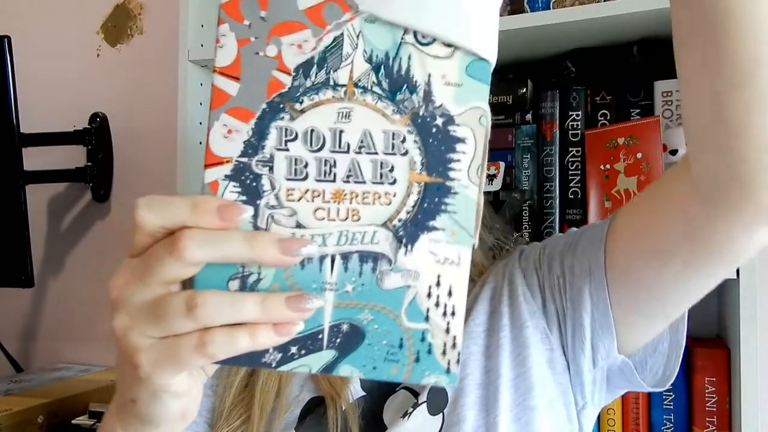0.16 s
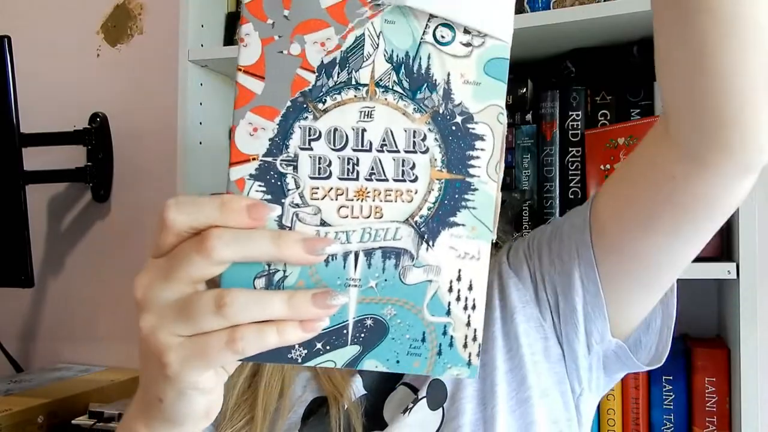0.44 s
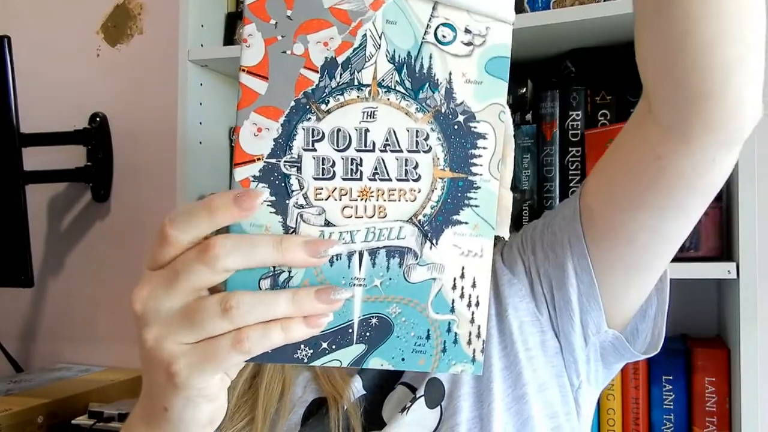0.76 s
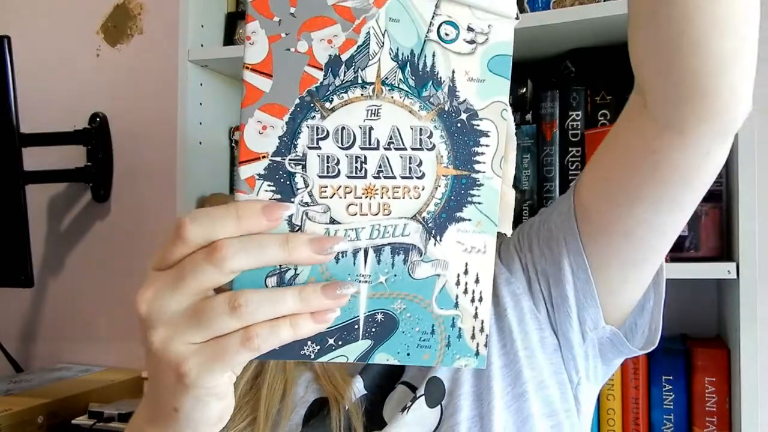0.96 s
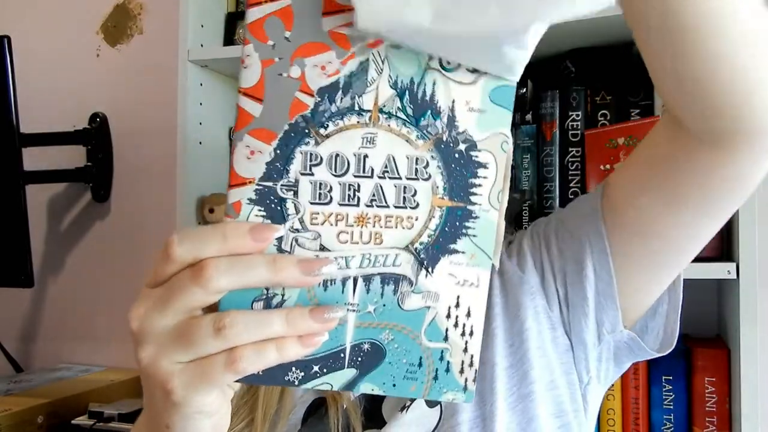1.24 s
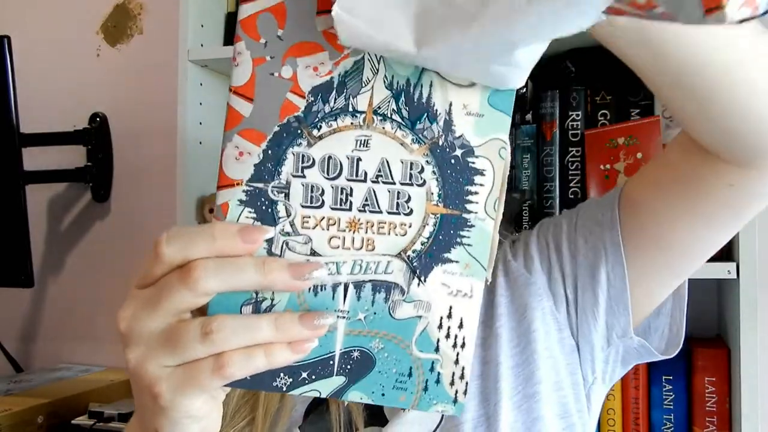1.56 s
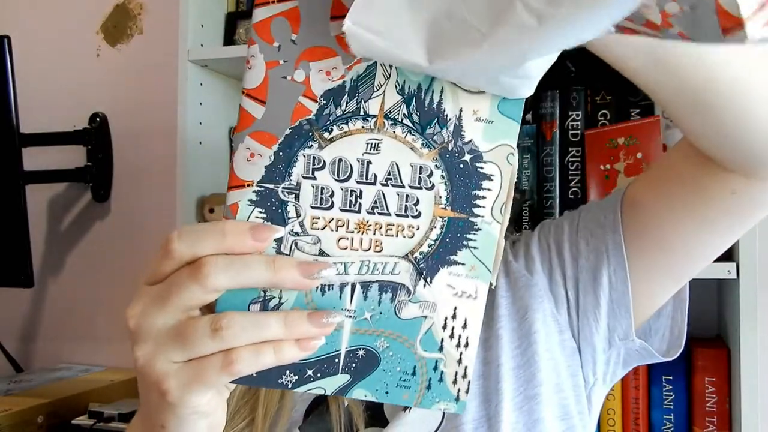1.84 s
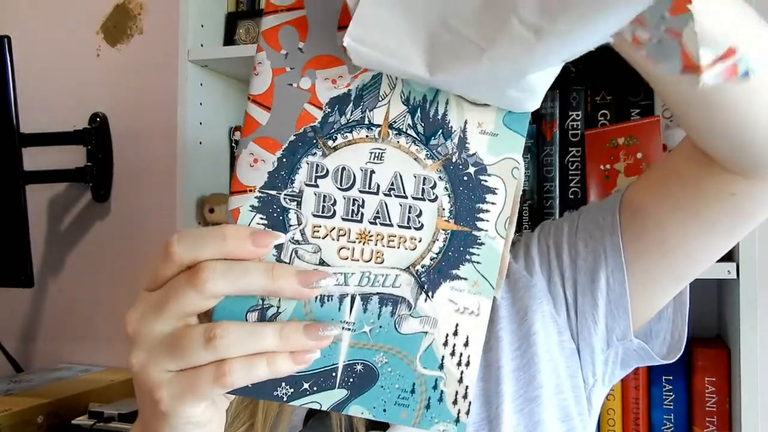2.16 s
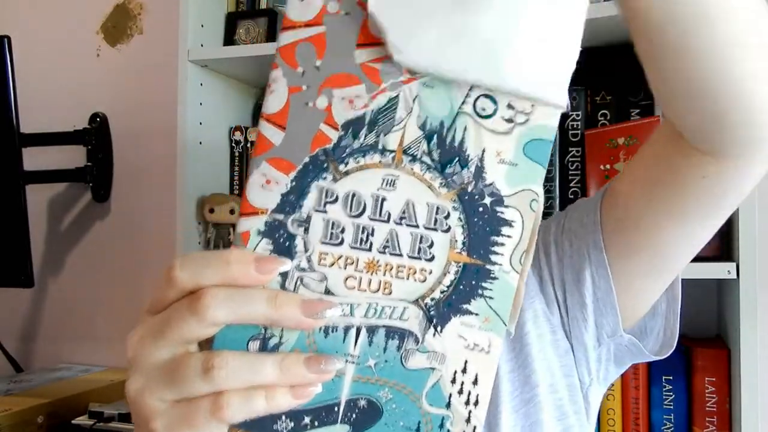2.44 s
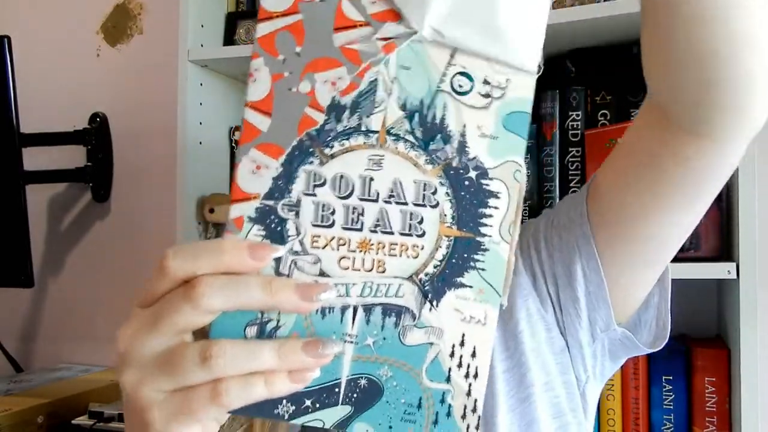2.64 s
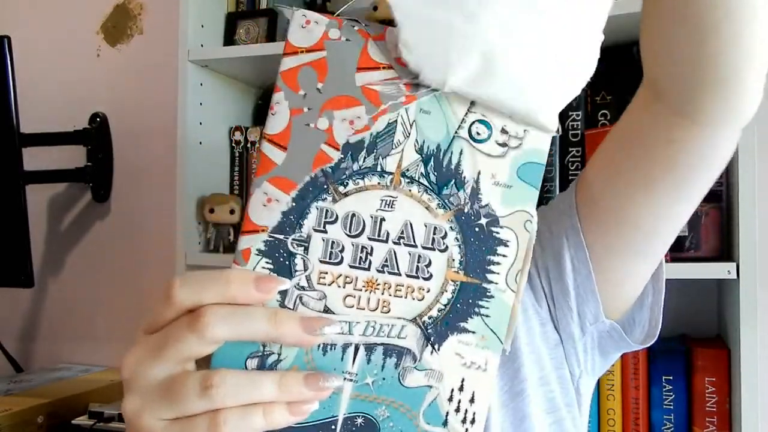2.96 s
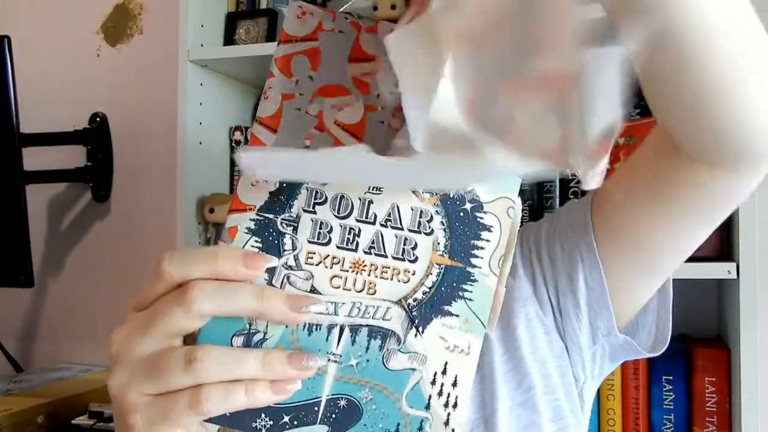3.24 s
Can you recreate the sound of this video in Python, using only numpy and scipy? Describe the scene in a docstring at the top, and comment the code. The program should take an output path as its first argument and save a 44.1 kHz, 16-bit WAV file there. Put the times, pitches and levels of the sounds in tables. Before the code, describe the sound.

Wrapping paper is torn off a book very close to a stereo microphone in a small furnished room: crackling burst, sharp snap, quieter crinkling, then louder ripping with dense snaps towards the end.

```python
"""Paper creases snap one by one over the clumped crackle and hiss of tearing fibres; a low rumble drags beneath.
Wrapping paper is torn and pulled off a book, close to a stereo pair of microphone ports in a small furnished room.
Snaps are clicks with short rings and cracks, thumps are low bursts, tearing is grains plus hiss.
Dragging is lumpy low noise with resonant booms; noise tails give the room."""
import sys
import numpy as np
from scipy import signal
from scipy.fft import rfft, irfft
from scipy.io import wavfile
from scipy.ndimage import uniform_filter1d

SR = 44100
rng = np.random.default_rng(int(sys.argv[2]) if len(sys.argv) > 2 else 0)


def voltage_ratio(level):
    """Linear amplitude factor for a level in decibels (scalar or array-like)."""
    return 10 ** (np.asarray(level, float) / 20)


def waveform_to_disk(signal):
    """Save audio, clipped to [-1, 1], as 16-bit WAV at the path in sys.argv[1]."""
    frames = np.transpose(np.atleast_2d(signal))
    scaled = np.clip(frames, -1, 1) * 32767
    samples = np.round(scaled).astype(np.int16)
    wavfile.write(sys.argv[1], SR, samples)


N = 149940


def evened(x):
    """Scales to rms 1."""
    return x / np.sqrt(np.mean(x ** 2) + 1e-20)


def read(points, hz):
    """Reads a table on a log-frequency axis."""
    f, value = np.transpose(points)
    return np.interp(np.log(hz + 1), np.log(f + 1), value)


def curve(points, t_s):
    """Reads a (time, value) table at times t_s, linearly."""
    time_s, value = np.transpose(points)
    return np.interp(t_s, time_s, value)


def colour(x, points):
    """Filters by a dB spectrum with minimum phase."""
    log_gain = np.log(voltage_ratio(read(points, abs(np.fft.fftfreq(4096, 1 / SR)))))
    taps = np.fft.ifft(np.exp(np.conj(signal.hilbert(log_gain)))).real[:2048]
    return signal.oaconvolve(x, taps)[:len(x)]


def wobble(seconds):
    """Random drift with the given time constant, rms 1: noise through two equal one-pole low-passes."""
    r = np.exp(-1 / (max(seconds, 1e-4) * SR))
    return evened(signal.lfilter([1], [1, -2 * r, r * r], rng.standard_normal(N)))


def resonance(x, hz, width_hz, zeros=(1,)):
    """Two-pole resonator driven by x, rms 1."""
    r = np.exp(-np.pi * width_hz / SR)
    poles = [1, -2 * r * np.cos(2 * np.pi * hz / SR), r * r]
    return evened(signal.lfilter(zeros, poles, x))


def burst(hz, rise_s, t_s):
    """Sine from t_s = 0 whose envelope peaks at rise_s, then dies away."""
    return np.sin(2 * np.pi * hz * t_s) * t_s / rise_s * np.exp(1 - t_s / rise_s)


def room(x):
    """A noise tail for each ear, each band dying at its own speed."""
    # reverberation: (frequency [Hz], T60 [s])
    t60_s = [(200, 0.078), (2000, 0.17), (7000, 0.13), (15000, 0.14)]
    gap_s = 0.00032
    hz, t, z = signal.stft(rng.standard_normal((2, SR // 2)), SR, nperseg=128)
    decay_db = -60 * t / read(t60_s, hz)[:, None]
    tail = signal.istft(z * voltage_ratio(decay_db), SR, nperseg=128)[1]
    tail = tail * (np.arange(tail.shape[1]) > gap_s * SR)
    return signal.fftconvolve(x[None], tail / np.linalg.norm(tail[0]), axes=1)[:, :N]


def dragging():
    """Sheet sliding on the cover: lumpy low noise, with resonances of the cover that boom under pressure."""
    # rumble of the drag: (time [s], level [dB])
    drag_db = [(0, -42.5), (.1, -48), (.19, -43.5), (.26, -51), (.4, -50), (.46, -62), (.62, -57),
               (.76, -64), (.93, -65.5), (.97, -61.5), (1.12, -58), (1.4, -48), (1.7, -45.5), (1.85, -41),
               (2.0, -40.5), (2.3, -41), (2.57, -41.5), (2.62, -58), (2.69, -54.5), (2.72, -45.5),
               (2.9, -55), (3.1, -57.5), (3.24, -57.5), (3.4, -44)]
    # rub spectrum: (frequency [Hz], relative density [dB per Hz])
    cover_db = [(20, -3), (35, -11), (100, -2.5), (150, -1.5), (250, -3), (400, -6), (750, -7),
                (1000, -17.5), (1400, -30.5), (2500, -52)]
    # cover resonances: (frequency [Hz], width [Hz], level before pressing [dB])
    booms = [(149, 18.6, -8), (207, 32, -9)]
    # boom gain as the sheet presses on the cover: (time [s], gain [dB])
    press_db = [(.8, -8), (1.8, 3.5), (2.8, -4)]
    lump_db, lump_s = 1.8, .012
    t = np.arange(N) / SR
    rub = evened(colour(rng.standard_normal(N), cover_db))
    for hz, width_hz, db in booms:
        drive = np.diff(rng.standard_normal(N + 1))
        rub = rub + voltage_ratio(db + curve(press_db, t)) * resonance(drive, hz, width_hz)
    rub = evened(rub * voltage_ratio(lump_db * wobble(lump_s)))
    return rub * voltage_ratio(curve(drag_db, t))


def fibre_grains():
    """Fibres giving way: sparse random grains at 24 pitches, rms 1."""
    grains_per_s, spread_db = 2500, 3.6
    size = voltage_ratio(spread_db * np.minimum(rng.exponential(1, N), 3))
    size = size * (rng.random(N) < grains_per_s / SR)
    kind, t, grains = rng.integers(0, 24, N), np.arange(256) / SR, np.zeros(N)
    for k, hz in enumerate(np.geomspace(500, 15000, 24)):
        grain = np.sin(2 * np.pi * hz * t) * t * hz * np.exp(-t * hz / 0.31)
        grain = grain * hz / np.linalg.norm(grain)  # higher grains are stronger
        grains += signal.oaconvolve(size * (kind == k), grain)[:N]
    return evened(grains)


def tearing():
    """Clumped grains and a patchy hiss follow the pull; harder pulls raise the grains against the hiss."""
    # pull on the paper: (time [s], crackle level [dB])
    tear_db = [(0, -32), (.08, -33), (.1, -31), (.2, -30), (.22, -39), (.29, -42.5), (.369, -44),
               (.374, -29.5), (.42, -42.5), (.45, -38.5), (.53, -53.5), (.59, -51.5), (.6, -37.5),
               (.68, -43.5), (.75, -58), (.79, -73), (.81, -56), (.87, -56.5), (.95, -52.5), (.965, -48),
               (1.06, -47), (1.15, -68), (1.18, -55), (1.33, -48), (1.36, -46.5), (1.5, -43.5),
               (1.54, -45.5), (1.62, -43.5), (1.69, -51), (1.75, -41), (1.84, -47), (1.93, -44),
               (1.98, -41.5), (2.03, -49), (2.14, -45.5), (2.2, -47), (2.255, -43.5), (2.305, -25.5),
               (2.34, -35), (2.38, -37.5), (2.49, -28.5), (2.51, -33.5), (2.57, -27), (2.6, -36.5),
               (2.69, -52), (2.71, -30.5), (2.76, -35), (2.815, -27.5), (2.86, -27), (2.93, -31.5),
               (3.04, -45.5), (3.2, -51), (3.228, -60), (3.24, -46.5), (3.4, -34)]
    # tearing spectrum before tilt: (frequency [Hz], relative density [dB per Hz])
    paper_db = [(40, -51), (150, -4), (250, -13.5), (500, -7.5), (800, -10.5), (1150, -6), (1420, -14),
                (1750, -2), (2400, -1.5), (3300, -1.5), (5000, -2), (7000, -0.5), (8300, -3), (9000, -7),
                (12000, -9), (15000, -13.5), (16000, -26)]
    # brightness of the tearing: (time [s], tilt [dB per octave of (Hz + 1000)])
    bright = [(0, 1.5), (.3, 1.5), (.7, 0), (1.2, -3.5), (1.7, -1.5), (2.2, -2), (2.6, -1.5), (2.9, -0.5),
              (3.4, -1)]
    grain_db, hiss_db = -4.5, -4
    grain_db_per_pull_db, mid_pull_db = .04, -38
    clump_db, clump_s, patch_db = 2.3, .002, 2.2
    pull_db = curve(tear_db, np.arange(N) / SR)
    grain_gain = voltage_ratio(grain_db + grain_db_per_pull_db * (pull_db - mid_pull_db))
    drive = grain_gain * fibre_grains() + voltage_ratio(hiss_db) * rng.standard_normal(N)
    drive = drive * voltage_ratio(clump_db * wobble(clump_s))
    hz, at_s, z = signal.stft(evened(colour(drive, paper_db)), SR, nperseg=256)
    patches = uniform_filter1d(rng.standard_normal(z.shape), size=7, axis=0)
    patches = evened(uniform_filter1d(patches, size=16, axis=1))
    tilt_db = curve(bright, at_s) * np.log2((hz[:, None] + 1000) / 5000)
    sound = signal.istft(z * voltage_ratio(patch_db * patches + tilt_db), SR, nperseg=256)[1][:N]
    return evened(sound) * voltage_ratio(pull_db)


def thumps():
    """The sheet slaps the cover: low bursts that rise in a fraction of a cycle."""
    # slaps: (time before lag [s], peak scale [dB], frequency [Hz])
    slaps = [(0.05, -31, 470), (0.175, -29.5, 670), (0.39, -20.5, 720), (0.408, -37, 700),
             (0.42, -30.5, 720), (0.595, -32, 706), (0.802, -50, 522), (0.956, -33, 527), (1, -45, 320),
             (1.237, -38, 766), (1.788, -28.5, 890), (2.298, -22, 750), (2.458, -25, 732),
             (2.48, -24.5, 730), (2.541, -22, 770), (2.564, -24, 514), (2.703, -28, 350), (2.771, -37, 670)]
    lag_s, rise_cycles = .002, .3
    out, t = np.zeros(N + SR), np.arange(1500) / SR
    for s, db, hz in slaps:
        at = round((s + lag_s - 60 / SR) * SR) + 60
        out[at:at + len(t)] += voltage_ratio(db) * burst(hz, rise_cycles / hz, t)
    return out[:N]


def snaps():
    """Creases buckle in several slips, big ones nearly at once: click, ring, mid crack, then a noisy shiver."""
    # creases: (time before lag [s], relative level [dB], ring [Hz], relative crack level [dB], crack [Hz])
    creases = [(0.0665, -19.5, 5400, -11, 3720), (0.0885, -15, 6270, -10, 3630),
               (0.0966, -20, 6660, -8, 3600), (0.112, -30, 7570, -19, 3430),
               (0.1367, -14.5, 4240, -16, 3550), (0.1553, -18, 6410, -10, 3400),
               (0.161, -11.5, 5980, -17, 3350), (0.1768, -21, 5000, -25, 3000),
               (0.187, -20, 4430, -33, 2920), (0.1909, -14, 4630, -34, 3800),
               (0.2085, -16, 5800, -16, 2300), (0.2657, -29.5, 6000, -9, 2320),
               (0.3012, -18.5, 7700, -33, 2630), (0.345, -15, 6840, -16, 3700),
               (0.3716, -16, 6800, -15, 3630), (0.3784, -15, 8300, -20, 3820), (0.387, -14, 7150, -5, 3200),
               (0.3914, 3, 7100, -16, 3110), (0.4083, -4.5, 5160, -19, 3620),
               (0.4152, -5.5, 7000, -15, 2570), (0.4195, -9.5, 7000, -17, 3200),
               (0.597, -14.5, 5750, -15.5, 2690), (0.6213, -19.5, 6530, -27, 2370),
               (0.6339, -14.5, 6240, -38, 3800), (0.6838, -28.5, 6430, -19, 2400),
               (0.802, -20, 7370, -32, 1820), (0.8858, -25.5, 6600, -32, 2410),
               (0.9122, -21.5, 7560, -19, 1790), (0.9575, -11.5, 6730, -16, 3770),
               (1.0007, -14, 6500, -12.5, 2300), (1.0533, -36.5, 6230, 2, 2390),
               (1.1653, -31, 5800, -11.5, 2010), (1.194, -42, 6520, -30, 2990),
               (1.1998, -19, 6200, -27, 3600), (1.2186, -32, 6380, -9, 2260), (1.238, -35, 4710, -5, 3680),
               (1.2646, -23.5, 3810, -7, 2250), (1.2893, -47, 3800, 6, 2330),
               (1.311, -38.5, 7200, -7, 2540), (1.3445, -35, 4830, 12.5, 2400),
               (1.3516, -23, 6960, -11, 2430), (1.4235, -39.5, 5260, 3, 2080),
               (1.4481, -34, 5200, -7, 3040), (1.4596, -25, 5960, -15, 1970),
               (1.4724, -29, 6840, -11, 1980), (1.485, -34, 4470, -1, 3270),
               (1.498, -13.5, 5200, -13, 3140), (1.9737, -19, 5040, -14, 2600),
               (2.138, -25.5, 7560, -18, 2020), (2.2621, -12, 6560, -34, 3740),
               (2.2985, -9.5, 6600, -16, 1740), (2.3039, -13, 4340, -19, 2900),
               (2.313, -25.5, 4150, -1, 2230), (2.386, -16, 6900, -16, 2700), (2.408, -11, 7100, -5, 1980),
               (2.4423, -25, 7960, -12, 3570), (2.4606, -19, 5030, -13, 2340),
               (2.4719, -13, 6450, -12, 2650), (2.4833, -15, 5030, -23, 2120),
               (2.4951, -3, 6660, -18.5, 2300), (2.5274, -15, 4940, -15, 2720),
               (2.5411, -12, 7680, -6, 2400), (2.5525, -9, 7820, -15.5, 2050),
               (2.5636, -6.5, 6970, -7, 2900), (2.5712, -11, 5960, -13, 2820),
               (2.582, -1.5, 6660, -20, 3880), (2.6735, -26, 5100, -26, 3740),
               (2.7057, -9.5, 7300, -10.5, 2620), (2.7147, -4, 6800, -14.5, 3800),
               (2.7224, -5, 7240, -23, 2530), (2.7302, -16.5, 4900, -12, 2880),
               (2.748, -23, 5790, -7, 2410), (2.7732, -7, 6860, -12.5, 2600),
               (2.7954, -18.5, 5040, -8.5, 2360), (2.84, -14.5, 6330, -12, 3600),
               (2.858, -10.5, 5330, -26, 1890), (2.98, -20.5, 5340, -6, 2850),
               (3.0183, -27.5, 5630, -10, 2630), (3.0583, -28, 7970, -11, 2820),
               (3.0971, -20, 5030, -25, 3300), (3.1138, -29, 4370, -31, 3530)]
    lag_s, snap_db = .0013, -2
    ring_cycles, click_db = 1.1, -1
    crack_s, crack_trim_db = .0008, 4
    shiver_s, shiver_db = .003, -20
    flurry_s, flurry_db, clean_per_db = .0011, -13, .45
    out, t = np.zeros(N + SR), np.arange(-60, 1440 + 60) / SR
    late = np.maximum(t, 0)
    for s, db, hz, crack_db, crack_hz in creases:
        phase = rng.standard_normal()
        ring = np.sin(2 * np.pi * hz * t + phase) * np.exp(-(t * hz / ring_cycles) ** 2)
        click = voltage_ratio(click_db) * burst(11300, .00003, late)

        when, size = rng.random((2, 4))
        slips = np.zeros(len(t))
        slip_gain = voltage_ratio(min(flurry_db - clean_per_db * db, -2))
        slips[(when * flurry_s * SR).astype(int)] = slip_gain * (2 * size - 1)
        slips[0] = 1  # main slip
        sound = np.convolve(ring + click, slips)[:len(t)]

        crack = np.sin(2 * np.pi * crack_hz * late) * np.exp(-late / crack_s)
        sound = sound + voltage_ratio(crack_db + crack_trim_db) * crack
        shake = resonance(rng.standard_normal(len(t)), hz, .9 * hz, zeros=(1, 0, -1))
        sound = sound + voltage_ratio(shiver_db) * shake * np.exp(-late / shiver_s) * (t > 0)
        at = round((s + lag_s + t[0]) * SR)
        out[at:at + len(t)] += voltage_ratio(db + snap_db) * sound
    return out[:N]


def scene():
    """Paper sounds jump between two ports over drag, room and noise; left is louder except in the top treble."""
    # microphone response on snaps and thumps: (frequency [Hz], gain [dB])
    mic_db = [(25, -45), (100, -1.5), (900, 3.5), (1400, -0.5), (2000, 5.5), (7000, 1.5), (11000, -3.5),
              (16000, -10)]
    # balance: (frequency [Hz], left minus right [dB])
    lean_db = [(60, 2.5), (110, 5), (200, 4.5), (380, 6), (700, 6.5), (1290, 5.5), (2380, 4.5), (4400, 4),
               (8120, 1), (15000, -1.5)]
    # stereo mixing: (frequency [Hz], nominal left-right likeness [0-1])
    likeness = [(30, .65), (200, .93), (1000, .89), (6000, .94), (14000, .6)]
    scatter_s, jump = .004, 1.7  # how fast and how far the sounding spot jumps
    room_db, floor_db = -9, -76
    clicks = colour(snaps() + thumps(), mic_db)
    paper = clicks + tearing()
    near = paper + dragging()
    other = paper * np.tanh(wobble(scatter_s)) * jump + dragging()
    hz = np.fft.rfftfreq(N, 1 / SR)
    half_angle = np.arccos(np.clip(read(likeness, hz), 0, 1)) / 2
    pair = np.cos(half_angle) * rfft(near) + np.sin(half_angle) * rfft(other) * [[1], [-1]]
    pair = pair + voltage_ratio(room_db) * rfft(room(clicks), axis=1)
    pair = pair * voltage_ratio(read(lean_db, hz) * [[.5], [-.5]])
    return irfft(pair, N, axis=1) + voltage_ratio(floor_db) * rng.standard_normal((2, N))


def top_cut(x):
    """Nothing passes above the cut-off."""
    return signal.sosfilt(signal.butter(12, 16500, fs=SR, output="sos"), x)


def record(dry):
    """Soft overload rounds the loudest peaks, then a steep low-pass limits the band."""
    knee, edge_hz = .85, 15900
    soft = knee * np.tanh(dry / knee)
    low_pass = signal.firwin(255, edge_hz, window=("kaiser", 8), fs=SR)
    limited = signal.oaconvolve(soft, low_pass[None], "same")
    return top_cut(limited)


dry = scene()
out = record(dry)
waveform_to_disk(out)
```